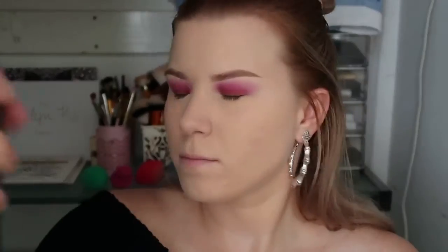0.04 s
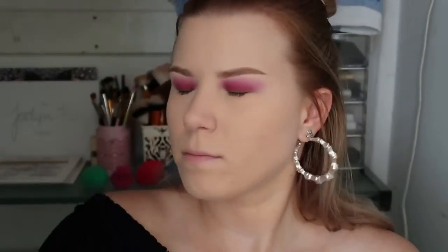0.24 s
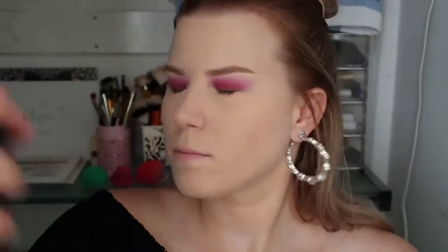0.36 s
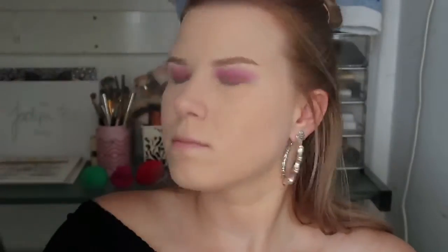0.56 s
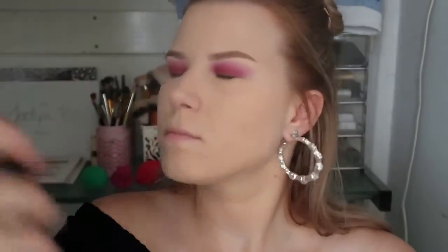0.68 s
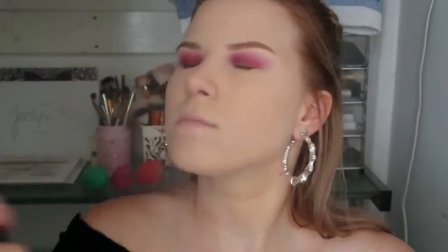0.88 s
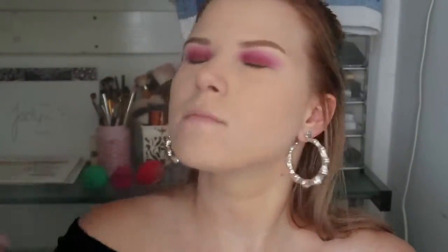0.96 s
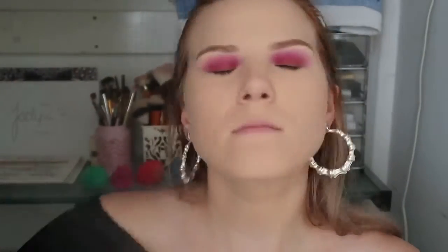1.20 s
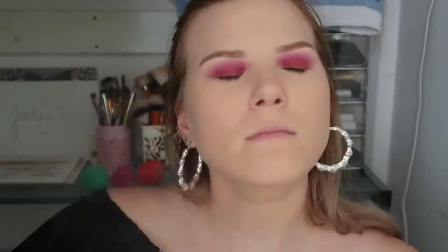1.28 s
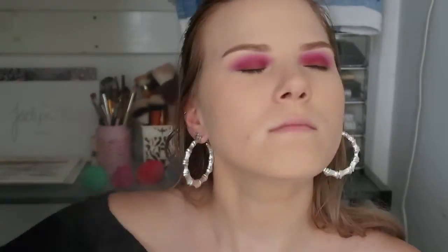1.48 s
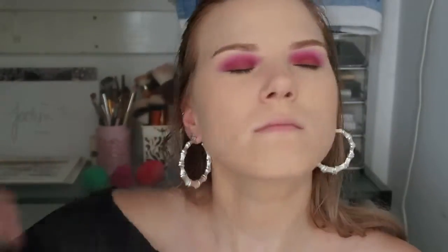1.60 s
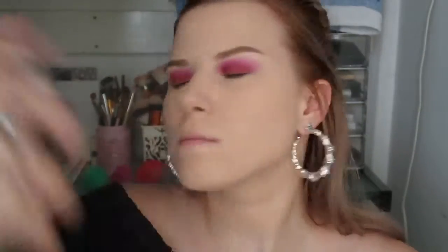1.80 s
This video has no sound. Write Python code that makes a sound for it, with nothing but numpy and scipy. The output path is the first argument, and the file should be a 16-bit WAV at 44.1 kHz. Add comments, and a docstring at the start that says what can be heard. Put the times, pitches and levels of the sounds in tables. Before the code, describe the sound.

A spray can mists in a small room with low, wavering ventilation rumble. Tiny plastic creaks come at about 0.1 to 0.19 seconds, then a sharp, overloading click at 0.2, slightly left, with a short metallic ring and room tail. Spray begins at once and hisses steadily to the end near 1.85, with a fluttering thin whistle near 3 kHz. The microphone level ducks briefly after the click.

```python
"""Ventilation rumbles in a quiet room with two wavering fan tones. A finger creaks on the cap of a spray can,
the valve snaps open with a sharp click, and the nozzle mists with a hiss that sings near 3 kHz.
Air and hiss are shaped noise, the singing is noise through resonances plus a whistling sine, and the
creaks and snap are decaying sines with echoes and a room tail for company.
The click overloads the microphone, whose gain control ducks for a moment."""
import sys
import numpy as np
from scipy import signal
from scipy.fft import rfft, irfft, next_fast_len
from scipy.io import wavfile
from scipy.ndimage import uniform_filter1d, map_coordinates

SR = 44100
rng = np.random.default_rng(int(sys.argv[2]) if len(sys.argv) > 2 else 0)


def unload_wav(signal):
    """Save mono or channel-first audio to the path in sys.argv[1] as 16-bit WAV at rate SR, clipped to [-1, 1]."""
    wavfile.write(
        sys.argv[1],
        SR,
        np.round(np.clip(np.atleast_2d(signal).T, -1, 1) * 32767).astype(np.int16),
    )


N = 81585


def amp(db):
    """Amplitude factor for a level in dB."""
    return 10 ** (np.asarray(db) / 20)


def unit(x):
    """x scaled to rms 1."""
    return x / np.sqrt(np.mean(x ** 2) + 1e-20)


def along(points, hz):
    """Read a curve of (Hz, value) points on a log frequency axis."""
    point_hz, values = np.transpose(points)
    return np.interp(np.log(hz + 1), np.log(point_hz + 1), values)


def curves(rows):
    """One value per sample for each column after the time."""
    seconds, *columns = np.transpose(rows)
    return [np.interp(np.arange(N) / SR, seconds, column) for column in columns]


def wobble(rate):
    """A smooth random curve with rate knots a second."""
    knots = rng.standard_normal(int(N * rate / SR) + 4)
    return map_coordinates(knots, [np.arange(N) * rate / SR])


def filtered(x, response):
    """x times a complex response of frequency."""
    size = next_fast_len(N + SR // 2)
    spectrum = rfft(x, size) * response(np.fft.rfftfreq(size, 1 / SR))
    return irfft(spectrum, size)[..., :N]


def stereo(mid, side):
    """Left and right from mid and side."""
    return np.array([mid + side, mid - side])


def rush(spectrum, side_db, patchy_db):
    """Stereo turbulence: coloured noise whose mid has rms 1, with patches of random gain."""
    z = signal.stft(rng.standard_normal((2, N)), nperseg=512)[2]
    # smoothing over frequency, then time, makes the patches
    field = uniform_filter1d(uniform_filter1d(rng.standard_normal(z.shape), 6, 1), 12, 2)
    pair = signal.istft(z * amp(patchy_db * unit(field)), nperseg=512)[1][:, :N]
    mid, side = filtered(pair, lambda hz: amp(along(spectrum, hz) + [0 * hz, along(side_db, hz)]))
    return stereo(mid, side) / np.sqrt(np.mean(mid ** 2))


def band(hz, width_hz):
    """Noise of rms 1 through a resonance applied twice; the width is that of one pass."""
    peak = lambda f: (1j * f * width_hz / (hz * hz - f * f + 1j * f * width_hz)) ** 2
    return unit(filtered(rng.standard_normal(N), peak))


def tone(hz, waver_hz, rate):
    """A sine of rms 1 whose pitch wavers at random."""
    pitch_hz = hz + waver_hz * wobble(rate)
    return np.sqrt(2) * np.sin(2 * np.pi * np.cumsum(pitch_hz) / SR)


def from_left(x, left_db, lag_s):
    """A source slightly left: louder and earlier in the left port."""
    gains = amp([[left_db / 2], [-left_db / 2]])
    return filtered(x, lambda hz: gains * np.exp(-2j * np.pi * hz * [[0], [lag_s]]))


# Colour of the ventilation rumble. Each row: frequency in Hz, relative density in dB per Hz.
AIR_COLOUR = [(15, -19), (30, -9), (60, -10), (90, -11), (135, -20), (160, -14), (200, -19), (260, -12),
              (450, -12.5), (570, -22.5), (750, -18.5), (1000, -20), (1300, -23.5), (2270, -29.5),
              (5000, -43.5), (11200, -53.5), (15500, -65)]
# Stereo spread of the rumble. Each row: frequency in Hz, side over mid in dB.
AIR_SPREAD = [(25, -60), (65, -48), (90, -29), (150, -12), (200, -12.5), (300, -14.5), (500, -11.5),
              (950, -10.5), (2380, -11.5), (5980, 3.5), (15000, 1)]
AIR_DB = -44.5
# Room resonances under the ventilation. Each row: frequency in Hz, width in Hz, relative level in dB.
HUM_RESONANCES = [(283.7, 26, -6), (353.5, 16, -10.5), (393, 12, -9), (671.3, 68, -11), (933, 64, -11)]
# Swell of those resonances. Each row: time in seconds, level in dB.
HUM_SWELL = [(0, -46), (.33, -50), (.5, -44), (.67, -48), (.8, -45.5), (1.1, -47.5), (1.33, -44),
             (1.6, -46.5), (1.85, -55.5)]
# Swell of the low fan tone. Each row: time in seconds, level in dB.
THROB_SWELL = [(0.0, -48), (0.066, -49.5), (0.442, -51.5), (0.504, -42.5), (0.628, -60), (0.684, -44.5),
               (0.772, -51), (1.086, -44), (1.118, -57), (1.158, -42), (1.328, -56), (1.426, -45),
               (1.818, -52), (1.85, -57)]
THROB_HZ, THROB_WAVER_HZ = 39.7, 6.9
# Swell of the higher fan tone. Each row: time in seconds, level in dB.
DRONE_SWELL = [(0, -62), (.26, -59), (.48, -55.5), (.61, -47), (.67, -64), (.75, -45), (1.04, -56),
               (1.2, -46), (1.27, -56), (1.33, -40.5), (1.4, -56.5), (1.7, -50), (1.85, -51.5)]
DRONE_HZ, DRONE_WAVER_HZ = 307.3, 9.26


def ventilation():
    """Broad noise rumble, a few narrow resonances humming on it, and two wavering fan tones."""
    hum_db, = curves(HUM_SWELL)
    throb_db, = curves(THROB_SWELL)
    drone_db, = curves(DRONE_SWELL)
    hum = amp(hum_db) * sum(amp(db) * band(hz, width_hz) for hz, width_hz, db in HUM_RESONANCES)
    throb = amp(throb_db) * tone(THROB_HZ, THROB_WAVER_HZ, 8.5)
    drone = amp(drone_db + 1.26 * wobble(25.2)) * tone(DRONE_HZ, DRONE_WAVER_HZ, 25)
    rumble = amp(AIR_DB + 0.37 * wobble(6.3)) * rush(AIR_COLOUR, AIR_SPREAD, patchy_db=1.03)
    return hum + throb + drone + rumble


# The cap creaks, gives, then snaps. Each row: start in seconds, strength in dB, pitch in Hz.
CAP_CLICKS = [(.1052, -29, 4300), (.1068, -29, 3800), (.1445, -34, 3900), (.186, -38, 3800),
              (.19935, -8, 2800), (.2004, -9, 2800), (.20125, 15, 2950)]
# Ringing modes of the plastic cap. Each row: ratio to the pitch, level in dB, 60 dB decay time in seconds.
CAP_MODES = [(.17, -45.5, 0.021), (.33, -40, 0.0087), (.48, -28, 0.0043), (.77, -11.5, 0.0037),
             (1, -2, 0.0048), (1.47, -3.5, 0.0013), (3, -12, 0.0021)]
CLICK_ATTACK_S = .0004


def clicks():
    """Every creak and snap rings the plastic cap briefly; neighbouring modes start in opposite sense."""
    out = np.zeros(N + SR)
    t = np.arange(SR // 20) / SR
    attack = (1 - np.exp(-t / CLICK_ATTACK_S)) ** 2
    for start_s, strength_db, pitch_hz in CAP_CLICKS:
        ring = np.zeros(len(t))
        for k, (ratio, level_db, t60) in enumerate(CAP_MODES):
            decay = amp(level_db - 60 * t / t60)
            ring += (-1) ** k * decay * np.sin(2 * np.pi * ratio * pitch_hz * t)
        out[round(start_s * SR):][:len(t)] += amp(strength_db) * ring * attack
    return out[:N]


# Reflections from nearby surfaces. Each row: delay in seconds, level in dB.
SURFACE_ECHOES = [(.0043, -19), (.0056, -20), (.0078, -19), (.0098, -16), (.011, -17), (.0126, -19),
                  (.015, -20), (.0168, -21), (.0212, -21), (.0243, -23), (.028, -23), (.0308, -24),
                  (.0365, -23), (.039, -25), (.043, -26), (.046, -25), (.051, -28), (.0545, -28)]
ECHO_HZ, ECHO_WIDTH_HZ = 2850, 1100  # the band that the surfaces return


def echoes(x):
    """Nearby surfaces return weak, delayed copies of one frequency band."""
    kept = lambda f: 1j * f * ECHO_WIDTH_HZ / (ECHO_HZ ** 2 - f * f + 1j * f * ECHO_WIDTH_HZ)
    copies = lambda f: sum(amp(db) * np.exp(-2j * np.pi * f * delay_s) for delay_s, db in SURFACE_ECHOES)
    return filtered(x, lambda hz: kept(hz) * copies(hz))


# How long the room rings. Each row: frequency in Hz, 60 dB decay time in seconds.
WALL_DECAY = [(300, 0.4), (1000, 0.39), (1500, 0.27), (2900, 0.32), (3600, .18), (5000, 0.023),
              (12000, 0.066)]
# Colour of the room tail. Each row: frequency in Hz, level in dB.
WALL_TINT = [(300, 6), (930, 2), (1300, 12), (1800, 3.5), (2300, -7), (2900, -10), (3500, -8), (4300, -3.5),
             (6000, 13), (12000, -28)]
WALL_DB, WALL_DELAY_S, WALL_SIDE_DB = -8.5, 0.0035, -15


def walls(x):
    """The room's answer, a tail of noise in which each frequency dies at its own speed."""
    hz, t, z = signal.stft(rng.standard_normal((2, SR // 2)), SR, nperseg=256)
    shape = amp(along(WALL_TINT, hz)[:, None] - 60 * t / along(WALL_DECAY, hz)[:, None])
    mid, side = signal.istft(z * shape, SR, nperseg=256)[1]
    tail = stereo(mid, amp(WALL_SIDE_DB) * side) / np.sqrt(SR * 0.0086)
    delayed = np.pad(x, (round(WALL_DELAY_S * SR), 0))
    return signal.fftconvolve(delayed[None], tail, axes=1)[:, :N]


# Flow of the spray. Each row: time in seconds, level in dB before the hiss boost.
SPRAY_FLOW = [(0.24, -46), (0.298, -45.5), (0.996, -48.5), (1.252, -50.5), (1.324, -45.5), (1.406, -48.5),
              (1.454, -45.5), (1.558, -50), (1.786, -46.5), (1.85, -47.5)]
# Colour of the jet hiss. Each row: frequency in Hz, relative density in dB per Hz.
HISS_COLOUR = [(900, -52), (1500, -10.5), (2200, -9), (2800, -30), (3400, 0), (4200, -4), (6000, -6.5),
               (9500, -10), (11500, -16.5), (12600, -12.5), (14500, -22.5), (16200, -47)]
# Stereo spread of the hiss. Each row: frequency in Hz, side over mid in dB.
HISS_SPREAD = [(900, 14), (1900, -94), (2800, -16), (3800, -8.5), (5000, 0.5), (7500, -0.5), (11500, 8),
               (13000, 11), (16000, 2)]
HISS_BOOST_DB, HISS_WOBBLE_DB = 2.5, .6
# Drift of the nozzle's singing. Each row: time in seconds, level in dB, centre in Hz.
SINGING_DRIFT = [(0.3, -42.5, 3000), (0.346, -43, 2940), (0.54, -39.5, 3020), (0.632, -40.5, 3100),
                 (0.662, -48, 2830), (0.786, -42, 2930), (1.094, -46, 3010), (1.11, -41.5, 3087),
                 (1.448, -45, 2730), (1.474, -48.5, 3040), (1.556, -41.5, 2860), (1.564, -45.5, 3000),
                 (1.716, -43, 2900), (1.724, -52, 2780), (1.784, -41.5, 2817), (1.85, -47, 3040)]
SING_WIDTH_HZ, SING_LOW_HZ, SING_HIGH_HZ = 610, 2762, 3147
SING_WOBBLE_DB, SING_LEFT_DB, SING_LAG_S = .9, .5, .00002
# Thin edge tone. Each row: time in seconds, level against the singing in dB, pitch in Hz.
EDGE_WHISTLE = [(.3, -4.5, 2850), (.45, -7.5, 2870), (.6, -2, 2814), (.7, -2, 2710), (.83, -5.5, 2843),
                (1, -7.5, 2812), (1.2, -4, 2933), (1.37, -3.5, 2805), (1.47, -0.5, 2800), (1.55, -3, 2778),
                (1.6, -4, 2780), (1.63, -1, 2777), (1.71, -5, 2790), (1.75, 2, 2818), (1.85, -2.5, 2840)]
WHISTLE_WOBBLE_DB, WHISTLE_WAVER_HZ = 3.5, 45
OPEN_S, RISE_S = .197, .004  # valve opening, time constant of the rise


def mist():
    """Broad jet hiss, a noisy resonance whose centre drifts, and a thin whistle start as the valve opens."""
    flow_db, = curves(SPRAY_FLOW)
    sing_db, sing_hz = curves(SINGING_DRIFT)
    whistle_db, whistle_hz = curves(EDGE_WHISTLE)
    opening = 1 - np.exp(-np.clip(np.arange(N) / SR - OPEN_S, 0, None) / RISE_S)

    hiss_db = flow_db + HISS_BOOST_DB + HISS_WOBBLE_DB * wobble(8.8)
    hiss = amp(hiss_db) * rush(HISS_COLOUR, HISS_SPREAD, patchy_db=1.5)

    # the centre drifts by crossfading two fixed resonances at equal power
    share = np.clip((sing_hz - SING_LOW_HZ) / (SING_HIGH_HZ - SING_LOW_HZ), 0, 1)
    low = np.sqrt(1 - share) * band(SING_LOW_HZ, SING_WIDTH_HZ)
    high = np.sqrt(share) * band(SING_HIGH_HZ, SING_WIDTH_HZ)

    whistle_gain = amp(whistle_db + WHISTLE_WOBBLE_DB * wobble(40.02))
    whistle = whistle_gain * tone(whistle_hz, WHISTLE_WAVER_HZ, 70)

    singing = amp(sing_db + SING_WOBBLE_DB * wobble(25.3)) * (low + high + whistle)
    return opening * (hiss + from_left(singing, SING_LEFT_DB, SING_LAG_S))


# Ringing modes of the can's body. Each row: frequency in Hz, level in dB, 60 dB decay time in seconds.
CAN_MODES = [(170, -34, .05), (330, -33, .04), (915, -36, .26), (1130, -41, .25), (1246, -36, .3),
             (1340, -33, .09), (1476, -41, .22), (1575, -43, .25), (1963, -37, .2), (2270, -40, .22)]


def can():
    """The final snap rings the body of the can as a set of decaying sines."""
    t = np.clip(np.arange(N) / SR - CAP_CLICKS[-1][0], 0, None)
    return sum(amp(db - 60 * t / t60) * np.sin(2 * np.pi * hz * t) for hz, db, t60 in CAN_MODES)


CLICK_LEFT_DB, CLICK_LAG_S = 1.5, .00003


def scene():
    """The can sits to the left: its click reaches the left port first."""
    click = clicks()
    near = from_left(click + echoes(click) + can(), CLICK_LEFT_DB, CLICK_LAG_S)
    room = amp(WALL_DB) * walls(click)
    return near + room + mist() + ventilation()


DUCK_FROM_DB, DUCK_SHARE, DUCK_BACK_S = -27.5, 2.45, 0.1  # threshold, dB per dB above it, time constant
CLIP_TOP, TOP_HZ = .96, 16300


def record(dry):
    """Slow gain control that sags after loud sound and creeps back, hard clipping, band limit."""
    power = uniform_filter1d(np.mean(dry ** 2, 0), 882, origin=440)  # over the last 20 ms
    level_db = 10 * np.log10(np.abs(power) + 1e-12)
    duck_db = DUCK_SHARE * np.clip(level_db - DUCK_FROM_DB, 0, None)
    keep = np.exp(-1 / (DUCK_BACK_S * SR))
    for _ in range(2):  # two smoothings delay the sag
        duck_db = signal.lfilter([1 - keep], [1, -keep], duck_db)
    clipped = np.clip(dry * amp(-duck_db), -CLIP_TOP, CLIP_TOP)
    return filtered(clipped, lambda hz: hz < TOP_HZ)


dry = scene()
out = record(dry)
unload_wav(out)
```